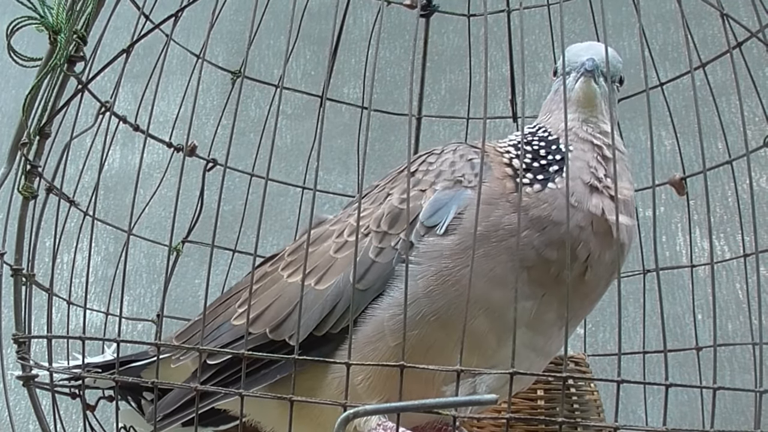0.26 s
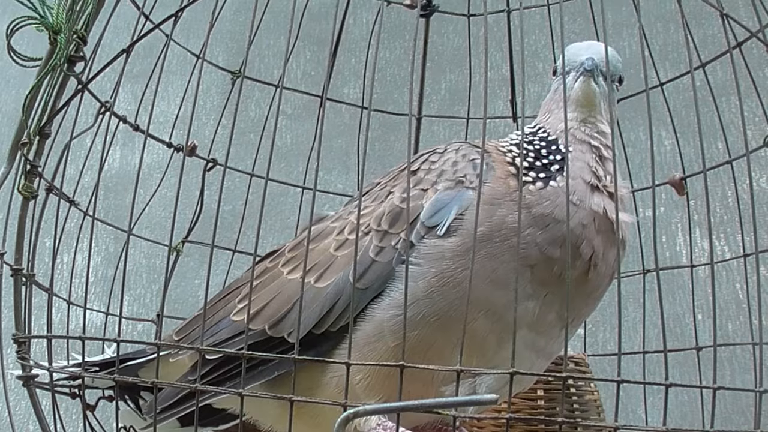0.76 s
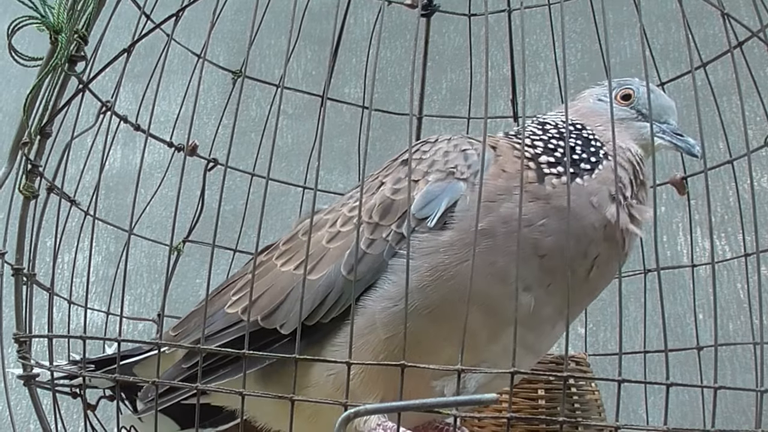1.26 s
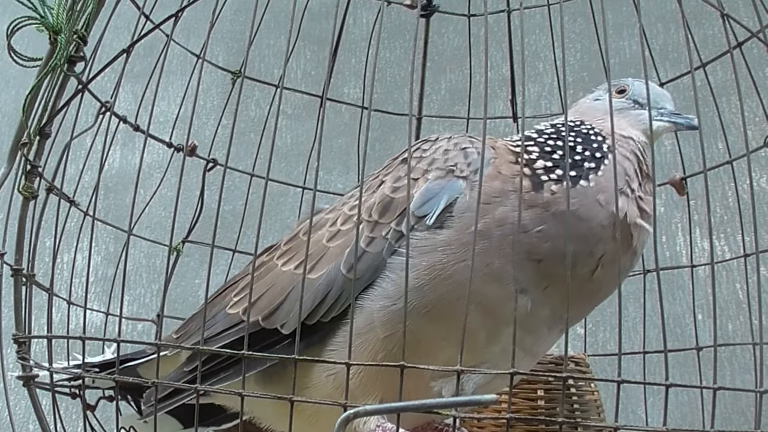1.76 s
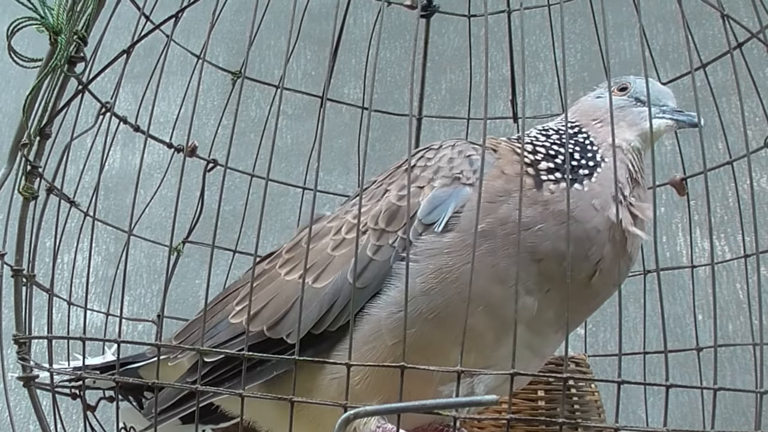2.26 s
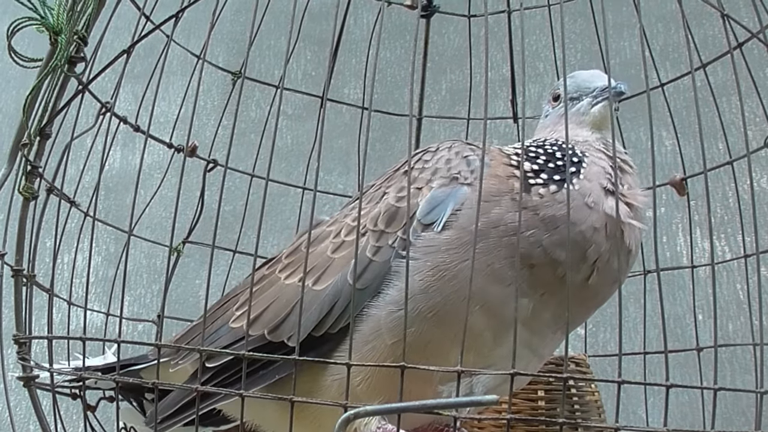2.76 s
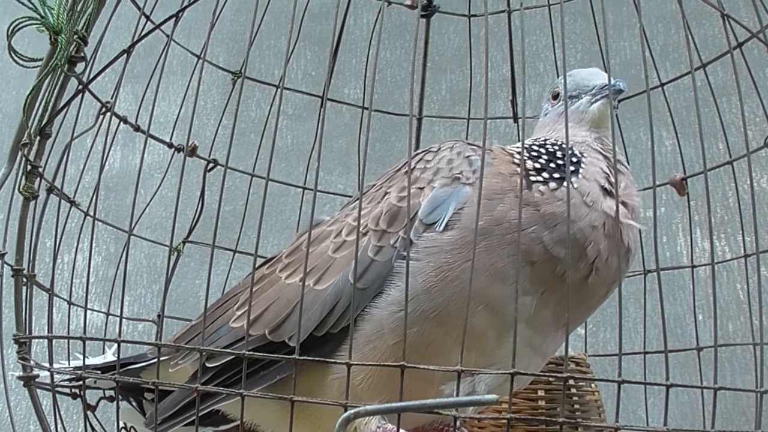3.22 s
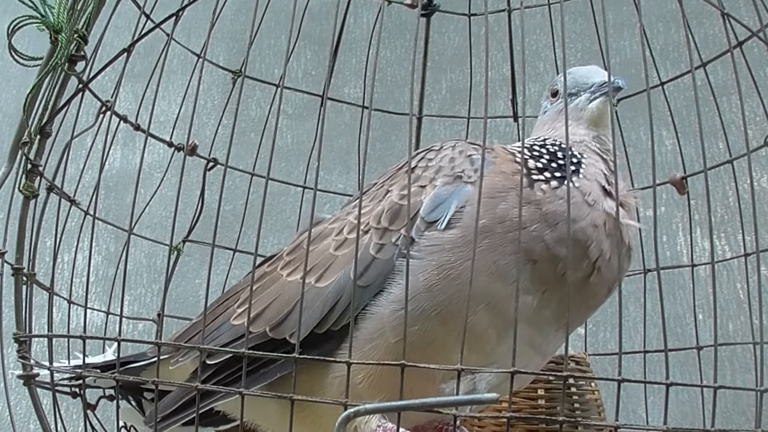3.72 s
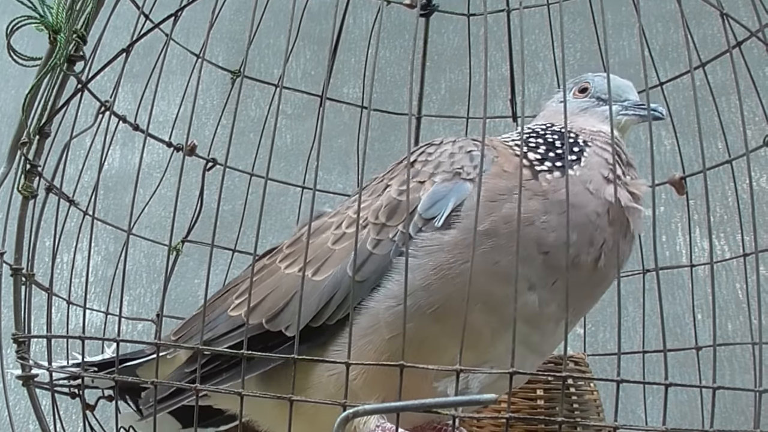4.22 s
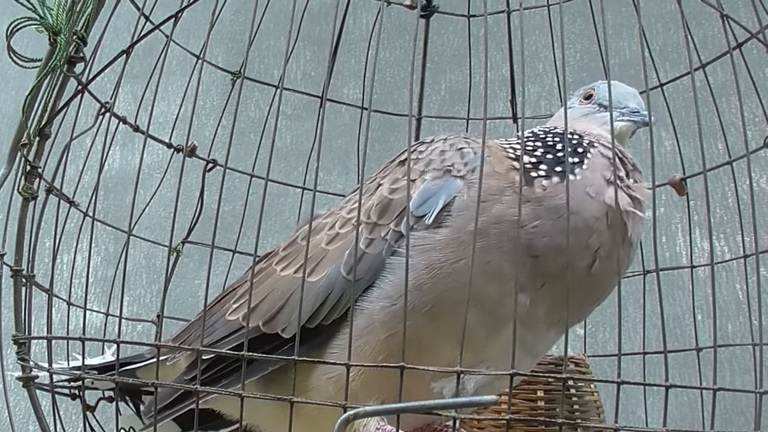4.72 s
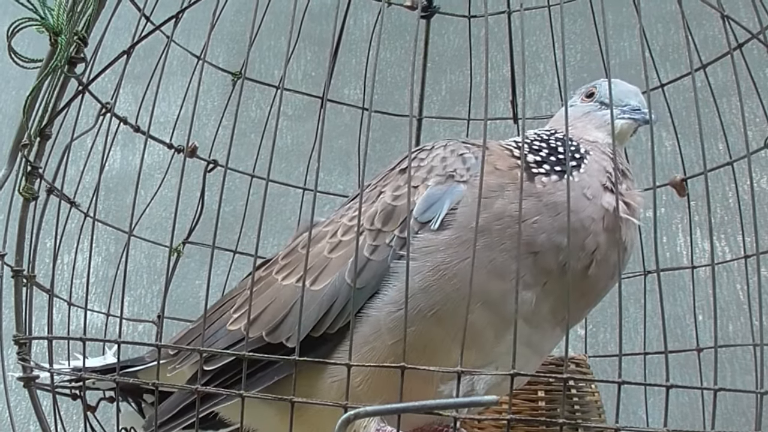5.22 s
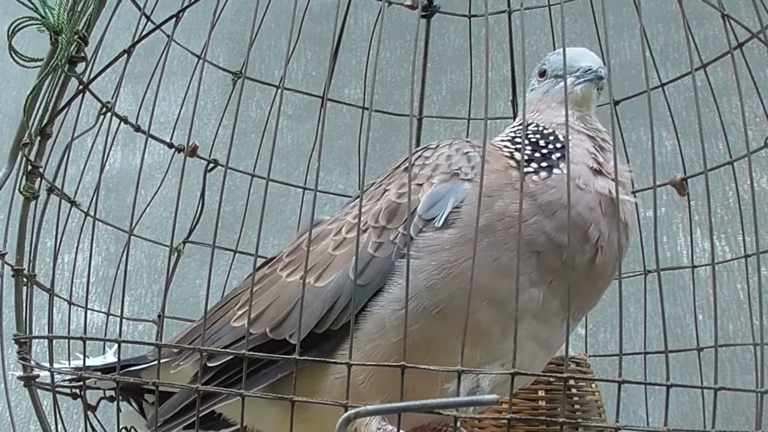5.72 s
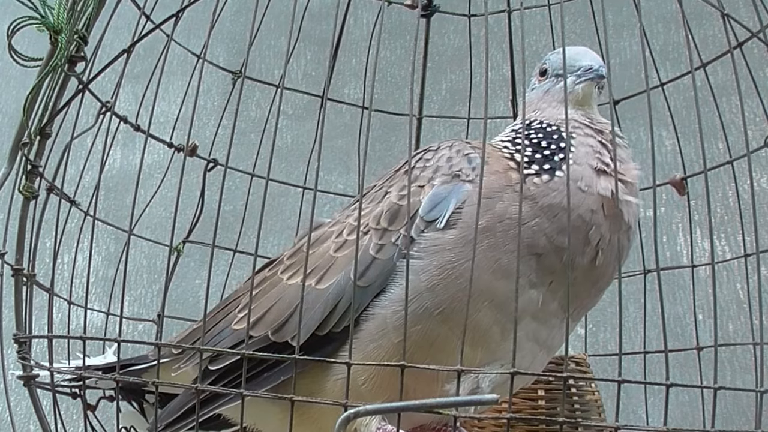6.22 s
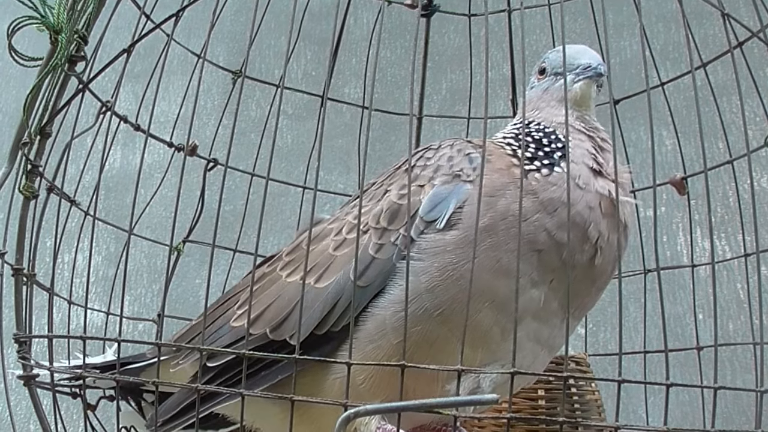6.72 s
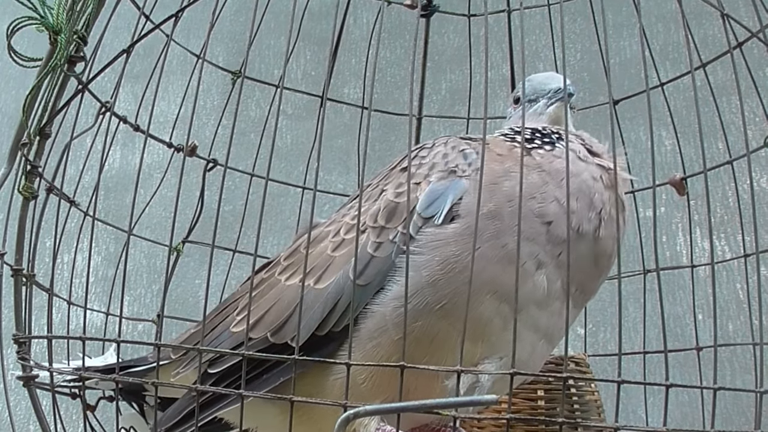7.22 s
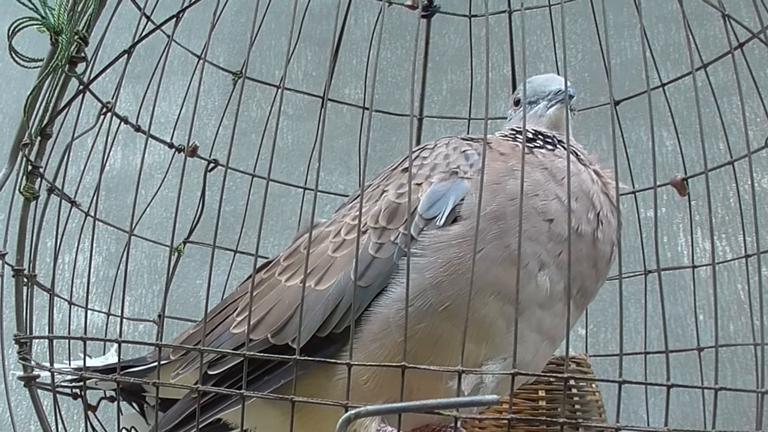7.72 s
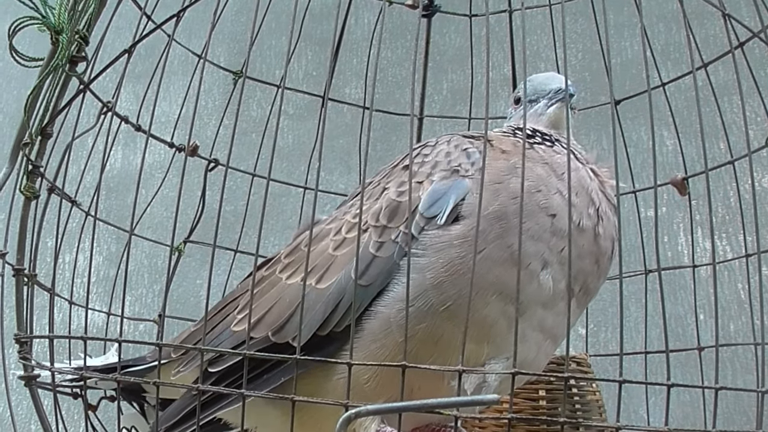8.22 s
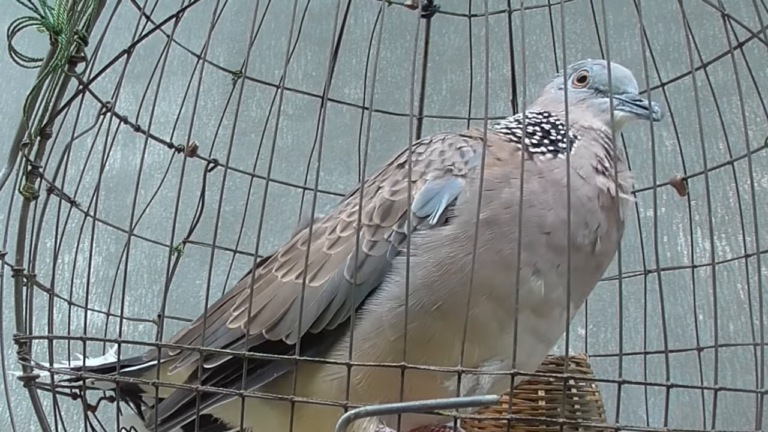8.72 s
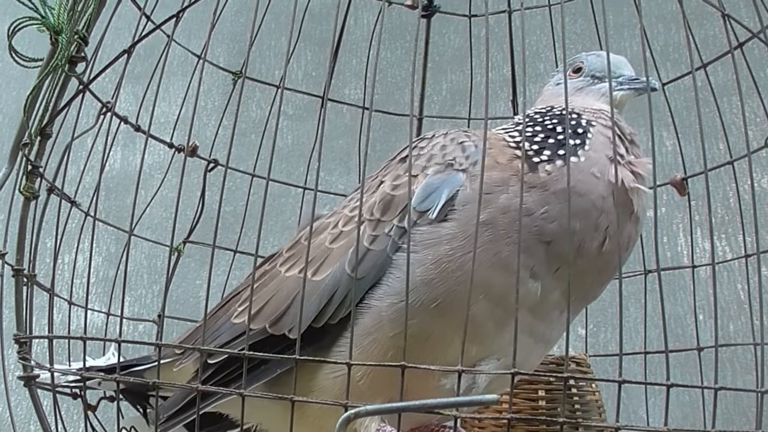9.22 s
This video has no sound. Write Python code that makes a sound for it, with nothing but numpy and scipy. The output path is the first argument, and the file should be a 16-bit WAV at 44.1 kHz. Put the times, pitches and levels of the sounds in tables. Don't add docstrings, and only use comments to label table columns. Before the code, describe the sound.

A caged dove close by sings three phrases of two short coos and a long falling purr, over shrill cicadas and faint traffic rumble.

```python
import sys
import numpy as np
from scipy import signal
from scipy.fft import rfft, irfft, next_fast_len
from scipy.io import wavfile
from scipy.ndimage import uniform_filter1d, map_coordinates

SR = 44100
rng = np.random.default_rng(int(sys.argv[2]) if len(sys.argv) > 2 else 0)


def dump(signal):
    limited = np.clip(np.atleast_2d(signal).T, -1, 1)
    pcm = np.round(limited * 32767).astype(np.int16)
    wavfile.write(sys.argv[1], SR, pcm)


def volts(x):
    e = np.asarray(x, float) / 20
    return 10 ** e


N = 417627
T = np.arange(N) / SR

# freq_hz [Hz], level_db [dB per Hz]
RUMBLE_COLOUR = [(15, -57), (25, -27.5), (55, -5.5), (93, -6), (144, -3), (330, -5), (782, -13.5),
                 (1300, -20), (1800, -29), (3430, -28.5), (6720, -31.5), (10100, -34), (13000, -34.5),
                 (15500, -45)]
# freq_hz [Hz], likeness [0-1]
TRAFFIC_LIKENESS = [(60, 0.8246), (180, 0.88), (550, 0.66), (1650, 0.35), (4970, 0.34), (15000, 0.13)]
# time_s [s], chorus_db [dB], rumble_db [dB]
BACKGROUND_LEVELS = [(0.0, -62.5, -48.5), (0.97, -59, -47.5), (1.868, -65.5, -48), (2.03, -60.5, -47),
                     (2.69, -58, -48), (3.51, -58, -48.5), (4.53, -61.5, -48.5), (5.49, -58, -49),
                     (6.96, -59.5, -48.5), (8.2, -58.5, -51), (8.44, -58, -48.5), (9.23, -66.5, -49.5),
                     (9.47, -56.5, -49.5)]
# freq_hz [Hz], level_db [dB]
ENGINE_ORDERS = [(91, 0.5), (113, -12), (136, -9.5), (182, -10.5), (228, -4.5)]
# time_s [s], level_db [dB]
ENGINE_LEVELS = [(0.0, -69), (.34, -57), (1.87, -53), (2.11, -50), (4.09, -51.5), (4.64, -62),
                 (6.01, -51.5), (7.5, -53), (8.09, -58.5), (9.47, -68.5)]
# pitch_hz [Hz], rate [strokes/s], rise_hz [Hz a stroke], level_db [dB]
FAR_CICADAS = [(2935, 2.1, 50, 3), (3010, 2.3, 51, -0.5), (2870, 2.1, 30, -8), (2800, 1.6, 22, -5)]
# centre_hz [Hz], width_hz [Hz], level_db [dB]
CHORUS_BANDS = [(2946, 200, -10.5), (5846, 540, -8), (8510, 600, -11), (11600, 800, -11.5),
                (14210, 730, -7)]
# start_s [s], length_s [s]
CICADA_STROKES = [(0, .5), (.62, .43), (1.1, .4), (1.62, .38), (2.02, .46), (2.5, .48), (3.0, .48),
                  (3.5, .5), (4.03, .49), (4.56, .52), (5.11, .52), (5.65, .5), (6.2, .37), (6.67, .35),
                  (7.1, .33), (7.55, .33), (8.0, .33), (8.45, .35), (8.92, .48)]
# multiple [x pitch], main_db [dB], lower_side_db [dB],
# upper_side_db [dB], growth_db [dB a stroke]
TYMBAL_OVERTONES = [(1, -68, -85, -83.5, -1.5), (2, -61, -73.5, -71.5, 20), (3, -67, -75, -70, 1),
                    (4, -61.5, -72, -66, 2), (5, -54.5, -57, -64, -2.5)]
# time_s [s], end_pitch_hz [Hz], fall_hz [Hz a stroke], level_db [dB]
CICADA_TIRING = [(0, 2952, 67, -7.5), (1.1, 2942, 58, -6.5), (1.62, 2886, 36, -4), (2.02, 2874, 46, 0),
                 (4.56, 2837, 39, 0), (5.65, 2822, 45, 0), (6.67, 2818, 31, -1.5), (8.0, 2799, 30, -4),
                 (8.92, 2781, 28, -6)]
# start_s [s], length_s [s], pitch_hz [Hz], arch_hz [Hz], level_db [dB]
FAR_NOTES = [
    (0, 0.29, 792, 80.5, -46),
    (.37, 0.22, 771, 101.8, -46),
    (.83, .14, 1460, 109, -55),
    (2.12, 0.18, 2070, 185, -59),
]
# start_s [s], length_s [s], centre_hz [Hz], width_hz [Hz], level_db [dB]
RUSTLE_PUFFS = [(0.02, 0.1, 2430, 2503, -58), (0.405, 0.0836, 3280, 1500, -61),
                (0.83, 0.19, 1630, 900, -54), (1.296, 0.067, 3039, 2880, -53.5),
                (2.119, 0.2, 2020, 504.5, -61), (2.575, 0.1, 4060, 3504, -56),
                (3.171, 0.0491, 2800, 2500, -72), (3.361, 0.073, 3200, 3000, -61),
                (3.954, 0.15, 7680, 7000, -53.5), (4.062, 0.3, 5900, 8030, -56.5),
                (6.995, 0.03874, 1500, 2000, -63), (8.613, .15, 1990, 1510, -58),
                (9.043, 0.19, 2140, 495, -59), (1.766, .04, 2150, 303, -62.5)]
# pitch_hz [Hz], level_db [dB]
DOVE_OCTAVE = [(380, 1), (470, -7.5), (560, -26.5), (660, -34), (790, -50.5)]
# multiple [x pitch], level_db [dB]
DOVE_UPPER = [(3, -52), (6, -44), (7, -44)]
# share [0-1 of length], pitch_hz [Hz], peak_db [dB], open_share [sound left between throbs]
FIRST_COO = [(.08, 570, -22.5, 0.47), (.25, 603, -12.5, .92), (.41, 636, -10, .37), (.58, 643, -8, 0.062),
             (.72, 600, -10, 0.5), (.82, 596, -31.5, 1), (.9, 600, -34.5, 1), (1, 591, -53.5, 0.81)]
SECOND_COO = [(.09, 558, -19.5, .45), (.22, 608, -14, .35), (.38, 660, -5.5, .35), (.54, 705, -5.5, .85),
              (.62, 770, -8.5, .97), (.74, 792, -7, 1), (.86, 745, -7.8, 1), (.915, 610, -15, 1),
              (1, 720, -38, 1)]
LONG_COO = [(.024, 655, -5.5, -0.057), (.075, 702.8, -4, -.15), (.11, 747.4, -5, -.15),
            (.2, 740, -6, -0.29), (.44, 697.3, -5.5, 0.19), (.58, 642.8, -9.5, 0.74),
            (.74, 579.3, -18, .88), (.95, 470, -27.5, 0.71), (1, 340, -39.5, 0.95)]
# shape [table], opening_s [s], gap_s [s], gap_loss_s [s a throb],
# joined [index of the throb that may join the next], scoop_s [s]
COO_KINDS = [
    (FIRST_COO, [], .015, 0, 3, .009),
    (SECOND_COO, [], .0142, .0006, 4, .006),
    (LONG_COO, [.011, .034, .048], .0194, .0005, 2, .0025),
]
# start_s [s], length_s [s], even_throbs_s [s after start], joining [0-1], level_db [dB]
PHRASES = [
    [(1.138, .09, .008, .31, .5), (1.297, .142, .013, .24, 0), (1.585, .458, .067, -.1, 0)],
    [(4.056, .087, .005, .45, 0), (4.232, .125, .011, .84, 0), (4.506, .436, .0625, .7, -.5)],
    [(8.506, .095, .012, .5, -1.5), (8.680, .134, .012, .86, 0), (8.959, .463, .069, .1, 0)],
]
# time_s [s], pitch_hz [Hz], peak_db [dB],
# length_s [s]
CROP_STIRS = [(1.234, 632, -32.5, 0.0045), (1.275, 628, -38, 0.0041), (1.289, 534, -32, 0.0038),
              (2.031, 731, -33, 0.013), (2.13, 730.4, -46.5, 0.025), (2.261, 757, -41.5, 0.02),
              (4.14, 593, -23, 0.0039), (4.211, 562, -31.5, 0.005), (4.224, 575, -24.5, 0.0053),
              (4.936, 755, -29, 0.0099), (8.591, 689, -29.5, 0.0049), (8.666, 586, -33, 0.003836),
              (9.41, 760, -30.5, 0.0085)]
# freq_hz [Hz], level_db [dB]
WALL_ANSWER = [(200, -38.5), (450, -4), (700, -11), (775, -1), (900, -10.5), (1600, -37.5)]
# freq_hz [Hz], t60_s [s]
WALL_DECAY = [(300, 0.0003), (770, .9), (2000, .4)]


def unit(x):
    return x / np.sqrt(np.mean(x ** 2) + 1e-20)


def along(points, hz):
    f, v = np.transpose(points)
    return np.interp(np.log(hz + 1), np.log(f + 1), v)


def wobble(rate):
    coarse = T[::50]
    knots = rng.standard_normal(int(N * rate / SR) + 4)
    return np.interp(T, coarse, map_coordinates(knots, [coarse * rate]))


def turns(hz):
    return 2 * np.pi * np.cumsum(hz) / SR


def filtered(x, response):
    m = next_fast_len(x.shape[-1] + 8192)
    spectrum = rfft(x, m) * response(np.fft.rfftfreq(m, 1 / SR))
    return irfft(spectrum, m)[..., :x.shape[-1]]


def rush(gain, alike):
    def turn(hz):
        return np.arccos(np.clip(along(alike, hz), -1, 1)) / 2

    pair = rng.standard_normal((2, N))
    mid, side = filtered(pair, lambda hz: gain(hz) * [np.cos(turn(hz)), np.sin(turn(hz))])
    return np.array([mid + side, mid - side])


def placed(x, pan_db, lag):
    late = np.interp(np.arange(N) - lag, np.arange(N), x)
    return np.array([volts(pan_db / 2) * x, volts(-pan_db / 2) * late])


def traffic():
    return volts(0.5 * wobble(3.8)) * unit(rush(lambda f: volts(along(RUMBLE_COLOUR, f)), TRAFFIC_LIKENESS))


def engine():
    orders = 0
    for hz, db in ENGINE_ORDERS:
        level = volts(db + 3.5 * wobble(4))
        orders = orders + level * np.sin(turns(hz * (1 + .007 * wobble(3))))
    return volts(np.interp(T, *np.transpose(ENGINE_LEVELS))) * orders


def strokes():
    start, length = np.transpose(CICADA_STROKES)
    row = np.clip(np.searchsorted(start, T) - 1, 0, None)
    return row, np.clip((T - start[row]) / length[row], 0, 1)


def chorus():
    voices = 0
    for hz, rate, rise_hz, db in FAR_CICADAS:
        stroke = (rate * T + rng.random()) % 1
        phase = turns(hz + rise_hz * (stroke - .5) + 12 * wobble(0.66) + 6 * wobble(50))
        voice = volts(-6.5) * np.sin(phase) + np.sin(2 * phase) + volts(-10.5) * np.sin(3 * phase)
        swell = volts(db + 1.0 + 1.8 * wobble(9) + 2.2 * wobble(30)) * np.sin(np.pi * stroke) ** 3
        voices = voices + placed(swell * voice, rng.normal(0, 2.5), rng.integers(-2, 3))

    def humps(f):
        return sum(volts(db) / (1 + np.abs(2 * (f - hz) / width) ** 2.0) for hz, width, db in CHORUS_BANDS)

    alike = [(3000, 0.8), (8500, 0.2), (14000, 0.3)]  # (Hz, likeness)
    sink = .012
    early = unit(rush(lambda f: humps(f * (1 - sink)), alike))
    late = unit(rush(lambda f: humps(f * (1 + sink)), alike))
    turn = np.pi / 2 * T / T[-1]
    bands = np.cos(turn) * early + np.sin(turn) * late
    pulse_db = 2.0 * np.sin(np.pi * strokes()[1] ** 1.5)
    return voices + volts(3.5 + 1.1 * wobble(5.5) + 2.0 * wobble(2.5) + pulse_db) * bands


def near_cicada(beat_hz=279):
    s, *song_now = np.transpose(CICADA_TIRING)
    starts = np.transpose(CICADA_STROKES)[0]
    bottom, drop, db = (np.interp(starts, s, column) for column in song_now)
    row, u = strokes()
    left_to_fall = (1 - u) ** 1.2
    turn = np.exp(1j * turns(bottom[row] + drop[row] * left_to_fall + 0.5 * wobble(40)))
    beat = np.exp(1j * turns(beat_hz + 1.5 * wobble(1.3)))
    song, power = 0, 1
    for k, main_db, low_db, high_db, growth_db in TYMBAL_OVERTONES:
        power = power * turn
        lines = volts(main_db) + volts(low_db) * np.conj(beat) + volts(high_db) * beat
        flicker_db = 2.2 * wobble(6) + 1.2 * wobble(16)
        song = song + volts(growth_db * (u - 0.55) + flicker_db) * np.imag(lines * power)
    envelope = 0.38 + 0.44 * np.sin(np.pi * u) ** 0.072
    return placed(volts(db[row]) * envelope * song, -.7, 0)


def far_birds():
    out = np.zeros(N)
    for s, length, hz, arch_hz, db in FAR_NOTES:
        u = np.clip((T - s) / length, 0, 1)
        level = volts(db + 2.5 * wobble(50)) * np.abs(np.sin(np.pi * u ** .6)) ** 0.8
        pitch = hz + arch_hz * np.sin(np.pi * u ** .7) + 28 * wobble(120)
        out = out + level * np.sin(turns(pitch))
    return volts(-3.0) * placed(out, 2.1, 1.8)


def rustles():
    out = np.zeros((2, N))
    for s, length, hz, width_hz, db in RUSTLE_PUFFS:
        u = np.linspace(0, 1, int(length * SR))
        grains = rng.standard_normal((3, SR // 2))[:, :len(u)]
        both = grains[0] + .5 * grains[1:]
        puff = filtered(both, lambda f: 1 / (1 + (2 * (f - hz) / width_hz) ** 2))
        out[:, int(s * SR):][:, :len(u)] += volts(db) * unit(puff) * np.sin(np.pi * u ** 0.5) ** 1.4
    return out


def ducking(x, knee_db=-22, slope=0.09, release_s=0.14):
    level = uniform_filter1d(np.abs(x), 1500)
    keep = np.exp(-1 / (release_s * SR))
    held = signal.lfilter([1 - keep], [1, -keep], level)
    return (1 + held / volts(knee_db)) ** -slope


def walls(x):
    hz, t, z = signal.stft(rng.standard_normal((2, SR)), SR, nperseg=512)
    colour_db = along(WALL_ANSWER, hz)[:, None] - 60 * t / along(WALL_DECAY, hz)[:, None]
    tail = signal.istft(z * volts(colour_db), SR, nperseg=512)[1]
    delayed = np.pad(x, (400, 0))[None]
    return signal.fftconvolve(delayed, tail / np.linalg.norm(tail[0]), axes=1)[:, :N]


def throbs(length, begin, opening, gap, loss):
    gaps = np.maximum(gap - loss * np.arange(60), .013)
    uneven = .0009 * rng.standard_normal(60)
    return np.r_[0, opening, begin, begin + np.cumsum(gaps) + uneven]


def crop_stirs(out):
    t = np.arange(-2000, 2000) / SR
    for s, hz, db, length in CROP_STIRS:
        part = out[int(s * SR) - 2000:][:len(t)]
        burst = volts(db) * np.exp(-(2.1 * t / length) ** 2) * np.sin(2 * np.pi * hz * t)
        part += burst[:len(part)]


def dove(narrow=1.0, chirp_hz=32, jitter_hz=3, scoop_hz=130, breath_db=-32):
    out = np.zeros(N)
    shake = jitter_hz * wobble(120)
    uneven_db = 0.7 * wobble(45)
    breath = unit(filtered(rng.standard_normal(N), lambda f: 1 / (1 + ((f - 900) / 300) ** 4)))
    coos = [(coo, kind) for phrase in PHRASES for coo, kind in zip(phrase, COO_KINDS)]
    for (start, length, begin, join, gain_db), (shape, opening, gap, loss, joined, scoop_s) in coos:
        share, pitch, level_db, open_share = np.transpose(shape)
        span = slice(int(start * SR), int((start + length) * SR))
        age = T[span] - start
        s = throbs(length, begin, opening, gap, loss)
        left = np.clip(np.interp(s / length, share, open_share), -.5, 1)
        left = left + .1 * (1 - left) * rng.standard_normal(len(s))
        left[0], left[joined] = 1, min(join, 1)
        place = np.interp(age, s, np.arange(len(s)))
        rest = left[place.astype(int)]
        lobe = np.abs(np.cos(np.pi * (place % 1) ** 1.1)) ** (1.5 + narrow * (1 - rest))
        gate = rest + (1 - rest) * lobe
        steady = np.clip(np.interp(age, s, left), .3, 1)
        hz = np.interp(age / length, share, pitch) - scoop_hz * np.exp(-age / scoop_s)
        chirp = chirp_hz * (1 - rest) * np.sin(2 * np.pi * place)
        phase = turns(hz + shake[span] + chirp)
        early_db = 9 * np.exp(-age / 0.017)
        tone = np.sin(phase) + steady * volts(along(DOVE_OCTAVE, hz) + early_db) * np.sin(2 * phase)
        upper = sum(volts(db) * np.sin(k * phase) for k, db in DOVE_UPPER)
        tone = tone + steady ** 2 * np.clip((690 - hz) / 40, 0, 1) * upper
        tone = tone + steady ** 2 * (hz >= 700) * volts(-53) * np.sin(5 * phase)
        fresh = np.exp(-age / 0.081)
        tone = tone + volts(breath_db) * (fresh + 0.94 * (1 - steady)) * (hz < 760) * breath[span]
        level = volts(np.interp(age / length, share, level_db) + gain_db + uneven_db[span])
        onset = np.minimum(place, 1) ** .75 * np.sin(np.pi / 2 * np.minimum(age / .002, 1)) ** 2
        release = np.minimum((length - age) / .004, 1)
        out[span] = level * onset * release * gate * tone
    crop_stirs(out)
    return out


def scene():
    bird = dove()
    s, chorus_db, rumble_db = np.transpose(BACKGROUND_LEVELS)
    trees = volts(np.interp(T, s, chorus_db)) * chorus() + near_cicada()
    street = volts(np.interp(T, s, rumble_db + 1.5)) * traffic() + volts(1.5) * engine()
    background = trees + street + far_birds() + rustles()
    direct = volts(.7) * placed(bird, 1.9, 4)
    return direct + volts(-41.0) * walls(bird) + ducking(bird) * background


def roll_off(x):
    return signal.sosfilt(signal.butter(12, 15270, fs=SR, output="sos"), x)


def record(dry):
    mix = filtered(dry, lambda hz: 1 / (1 + (hz / 15050) ** 60))
    return roll_off(mix)


dry = scene()
out = record(dry)
dump(out)
```